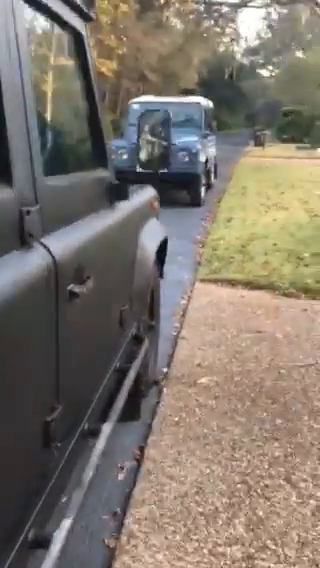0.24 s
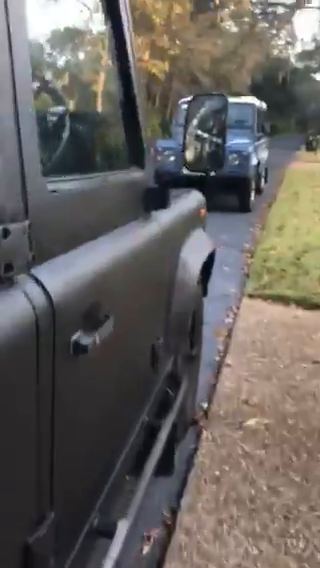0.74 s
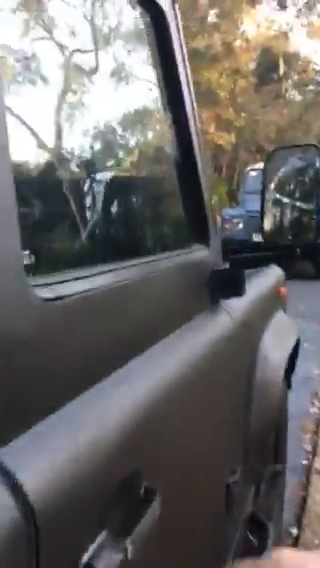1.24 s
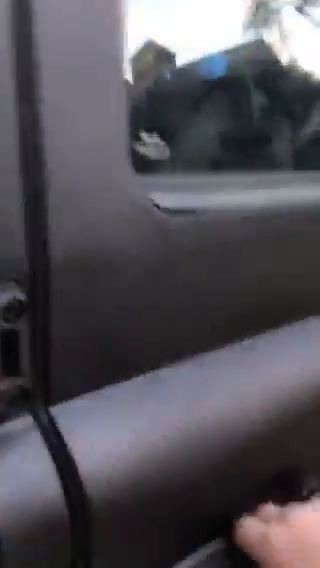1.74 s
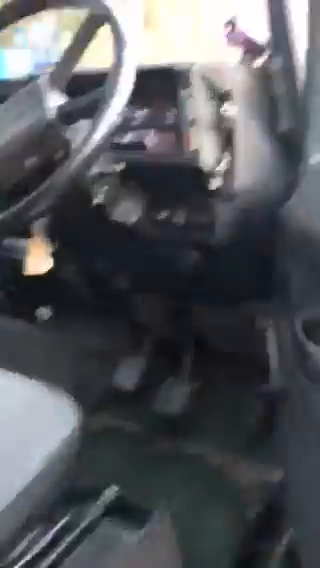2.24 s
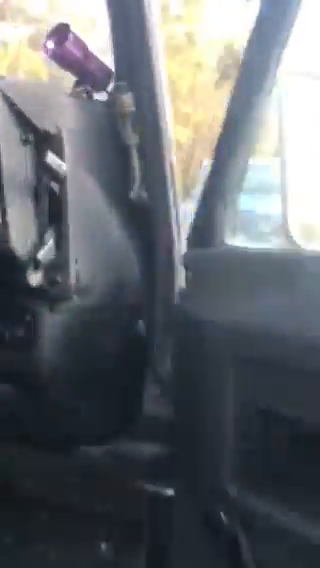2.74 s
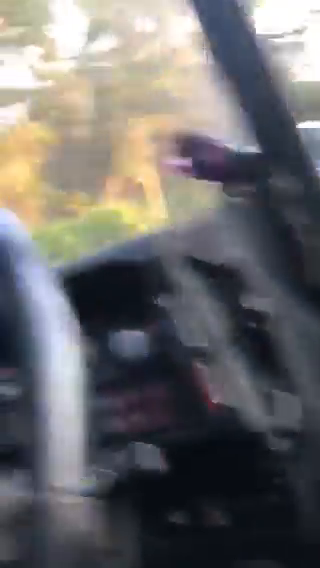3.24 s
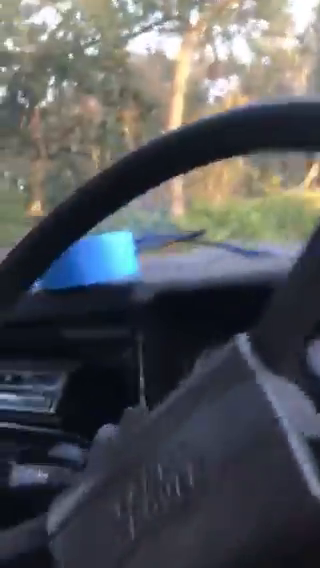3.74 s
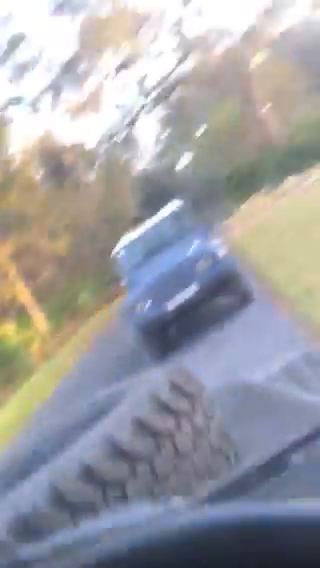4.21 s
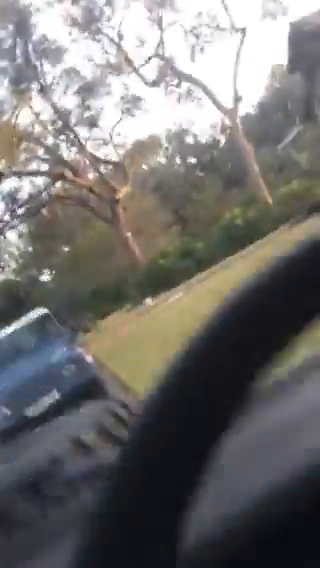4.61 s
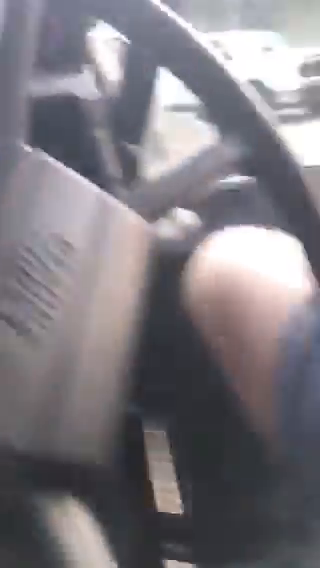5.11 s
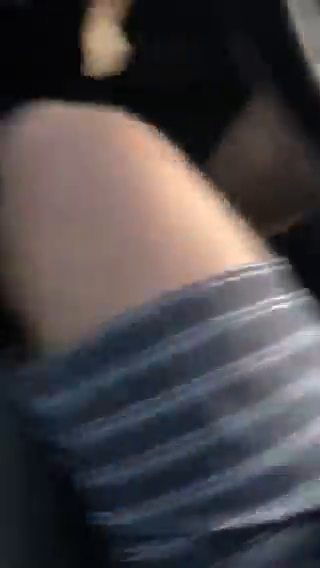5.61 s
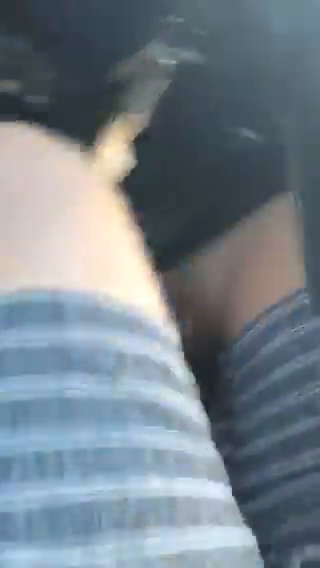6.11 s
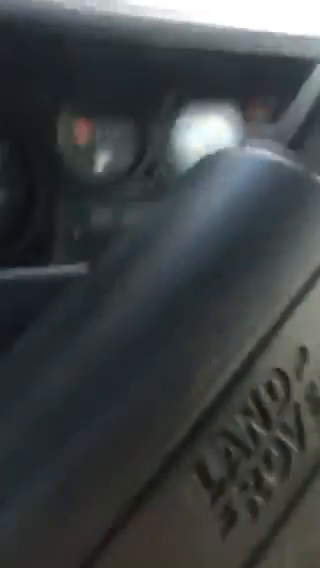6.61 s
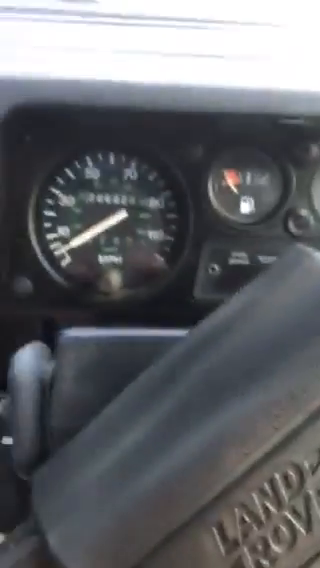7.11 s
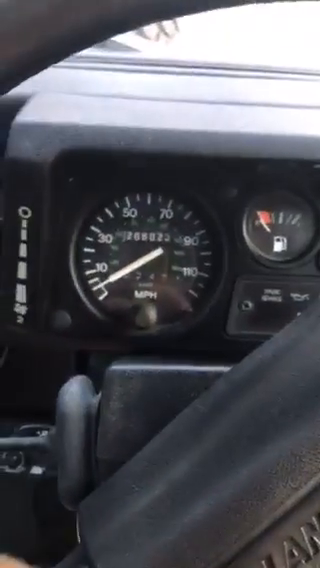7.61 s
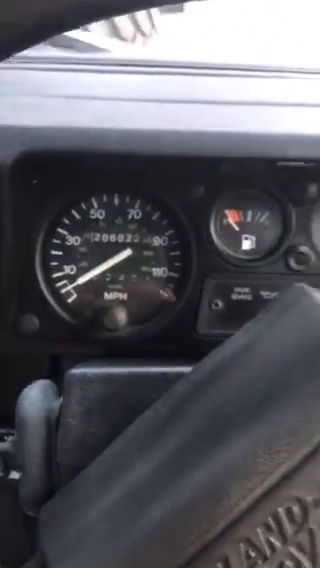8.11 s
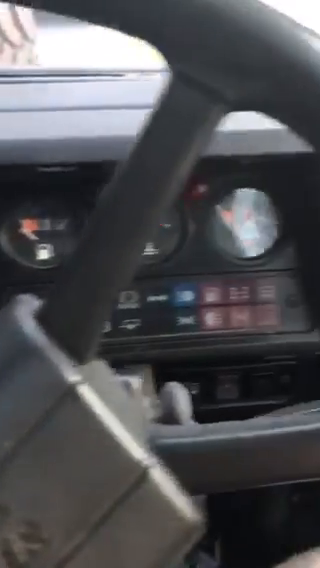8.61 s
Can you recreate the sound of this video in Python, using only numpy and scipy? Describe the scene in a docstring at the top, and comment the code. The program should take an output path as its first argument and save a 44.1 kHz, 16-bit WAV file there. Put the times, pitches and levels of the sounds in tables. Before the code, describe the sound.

A vehicle's metal door unlatches, someone climbs in with thuds and rustling, then slams it shut over a low idling engine hum.

```python
"""An off-road vehicle's sheet-metal door opens and, once someone has climbed in, slams shut.
Handle, latch and slam ring panel modes; the body then rocks and loose fittings rattle.
Feet and weight make the cabin boom, hard trim clicks, clothes slide, the seat creaks and squeals.
An engine idles nearby. The shut door seals out the outdoor hiss; the low hum comes through."""
import sys
import numpy as np
from scipy import signal
from scipy.fft import rfft, irfft, next_fast_len
from scipy.io import wavfile
from scipy.ndimage import uniform_filter1d

SR = 44100
rng = np.random.default_rng(int(sys.argv[2]) if len(sys.argv) > 2 else 0)


def int16_out(signal):
    """Quantize to a 16-bit WAV file."""
    q = np.round(np.clip(np.atleast_2d(signal).T, -1, 1) * 32767)
    wavfile.write(sys.argv[1], SR, q.astype(np.int16))


N = 390417
T = np.arange(N) / SR
SHUT_S = 6.01  # door meets its seal

# Noise spectra. Each row: frequency in Hz, relative level in dB.
OUTSIDE_SPECTRUM = [(110, -36.5), (180, -2), (298, -6.5), (466, -6), (511, -6), (729, 0), (1350, -6),
                    (2840, -20), (5360, -25), (9730, -34.5), (10500, -37.5), (12600, -36), (15500, -43)]  # open air and engine fan
CABIN_SPECTRUM = [(150, -30), (250, -5.5), (347, -9.5), (385, -4), (474, -8.5), (795, -5), (852, -5.5),
                  (1380, -11.5), (1510, -14), (2090, -15.5), (15500, -26)]
EXHAUST_SPECTRUM = [(20, -10.5), (35, -8), (48, -3.5), (62, 2.5), (85, -5), (120, -3), (160, -11),
                    (210, -18.5), (300, -35.5), (500, -57), (2000, -100)]
SWISH_SPECTRUM = [(200, 13), (480, 2.5), (770, 8), (1500, 1.5), (1980, 6), (2900, 1), (3920, 2.5),
                  (5200, 0.5), (6200, -2), (8500, -2), (10300, -6.5), (11500, -4.5), (14000, -5.5),
                  (16000, -11)]
SCUFF_SPECTRUM = [(200, 16.5), (450, -5), (620, -1.5), (1400, 0.5), (2800, -6.5), (3400, -11), (8000, -17),
                  (15000, -51)]
CREAK_SPECTRUM = [(300, -22), (480, 1.5), (600, 9), (1400, 0), (2300, -1.5), (2820, -5), (3200, -15),
                  (4500, -31), (5350, -15), (6000, -17), (15000, -29)]
# Outdoor hiss screened as the phone moves inside, then as the door is pulled to.
# Each row: start in seconds, end in seconds, change in dB.
SCREENING = [(2.0, 3.3, -4.5), (5.15, 5.497, -5)]
# Idle hum. Each row: multiple of the firing rate, relative level in dB.
FIRING_HARMONICS = [(1, -15), (2, 1), (3, -5), (4, -14), (5, -25.5)]
# Soft swells of hiss: clothes sliding, the latch bolt scraping, the door swishing shut.
# Each row: peak time, rise and fall in seconds, relative level in dB.
SWISHES = [(1.73, 0.14, 0.13, -60), (1.95, 0.11, .06, -60), (2.3, 0.031, 0.12, -62),
           (3.01, 0.24, 0.094, -47.5), (3.48, 0.29, 0.25, -54.5), (3.83, 0.04, .08, -58.5),
           (4.22, 0.25, 0.17, -53), (4.72, 0.28, 0.33, -56.5), (4.97, 0.087, 0.093, -52.5),
           (5.15, 0.12, .05, -54), (5.28, 0.14, 0.15, -58), (5.8, 0.36, 0.6, -56.5),
           (5.97, 0.073, 0.057, -46.5), (6.57, .28, 0.29, -57.5), (6.82, 0.17, 0.11, -55.5)]
# Handle, soles and seat cover scraping. Each row: start and length in seconds, level in dB.
SCUFFS = [(1.48, 0.037, -48), (3.772, 0.14, -47), (4.09, 0.37, -50.5), (4.873, 0.13, -53),
          (6.77, 0.081, -55)]
# Seat and step under load. Each row: start and length in seconds, slips per second, level in dB.
CREAKS = [(3.774, 0.2, 230, -47), (8.749, 0.077, 580, -62.5)]
# Seat frame rubbing. Each row: start and length in seconds, centre and width in Hz, level in dB.
SQUEALS = [(3.782, 0.075, 5350, 200, -63), (3.821, 0.11, 2650, 500, -51.5), (3.89, 0.21, 2530, 450, -57),
           (8.743, 0.12, 578, 50, -64.5)]
# Weight on floor, step and seat; panels flexing. Each row: start in seconds, level in dB,
# boom in Hz, nominal t60 and rise in seconds, panel mode offset in dB.
THUDS = [(1.878, -20.5, 90, 0.11, .004, -3), (1.881, -18.5, 363, 0.063, 0.0071, -14.5),
         (1.996, -17.5, 265, 0.053, 0.0016, -15), (2.002, -24, 99.7, 0.26, 0.0094, -3),
         (2.048, -23.5, 181, 0.13, 0.0021, -16), (2.579, -38.5, 192, 0.16, 0.0076, -14),
         (2.815, -30.5, 199.5, 0.13, 0.014, -13.5), (3.052, -31, 72, .15, 0.013, 0),
         (3.907, -4.5, 75.5, 0.18, 0.017, 2), (3.987, -18.5, 66.3, 0.21, 0.0058, 0.5),
         (5.113, -17, 64.2, 1.0, 0.03, -19.5), (5.286, -9, 68.2, 0.3, 0.011, -1.5),
         (5.326, -4, 77.7, 0.12, 0.0087, -18), (5.563, -19, 79.1, 0.23, 0.029, -2),
         (5.734, -10.5, 69, 0.22, 0.0094, -11.5), (5.811, -20.5, 62.5, 0.26, 0.014, -16),
         (5.973, -11.5, 72, 0.22, .008, 2), (6.003, -2, 72, 0.18, .016, -3.5),
         (6.046, -3, 57.5, 0.29, 0.0039, -4.5), (6.06, -18.5, 192.4, .16, 0.0049, -20),
         (6.151, -20, 61.6, .5, 0.013, -22), (6.282, -23.5, 59, .35, .02, -32),
         (6.608, -22.5, 80, .07, .003, -10), (6.736, -25, 119.2, 0.32, .006, -6.5)]
# Floor and wall panels. Each row: multiple of the boom, relative level in dB, share of the boom's t60.
PANEL_MODES = [(1.87, -3, .8), (2.95, -21, .6)]
# Blows. Each row: start in seconds, relative levels of panel ring, hollow body and contact tick in dB,
# t60 in seconds.
FITTING_BLOWS = [(0.0334, -41.5, -45, -50, 0.022), (1.1362, -39.5, -49, -55, 0.063),
                 (1.2055, -37, -53, -54, 0.11), (2.7765, -34, -36, -50, 0.085),
                 (2.8107, -44, -40.5, -47, 0.061), (5.5398, -42, -58, -52.5, 0.038),
                 (5.7703, -43, -45, -50, 0.031), (5.8096, -40, -41, -52, 0.033),
                 (6.6059, -19.5, -25, -43.5, 0.037)]
FOOT_BLOWS = [(2.7749, -36.5, -41.5, -50, 0.18), (3.0674, -50, -37.5, -51, 0.08),
              (3.9, -30, -29.5, -56, 0.13), (5.2862, -39, -36, -60, 0.13), (5.3332, -46, -35, -60, 0.09),
              (5.5566, -43, -38.5, -61, 0.22), (5.5836, -36.5, -31.5, -56, 0.087),
              (5.7408, -43, -34.5, -58, 0.15), (6.741, -41, -28.5, -62, 0.075),
              (6.7644, -54, -40, -59, 0.18)]
TRIM_BLOWS = [(3.1133, -27.5, -40, -57, 0.042), (3.1946, -29.5, -42.5, -45.5, 0.079),
              (3.4169, -30.5, -49, -65, 0.023), (4.576, -31, -21.5, -51, 0.067),
              (4.5833, -49, -22.5, -63, 0.077), (4.6437, -33, -45, -67, 0.06),
              (4.7418, -34.5, -66, -50, 0.026), (4.9118, -44, -40.5, -70, 0.038),
              (6.6282, -38, -39, -62, 0.035), (6.7294, -32, -24.5, -44.5, 0.036)]
OPENING_BLOWS = [(1.4906, -29.5, -41, -42.5, 0.19), (1.5035, -37, -36.5, -44, 0.069),
                 (1.5185, -24.5, -35.5, -41.5, 0.058), (1.5384, -32, -55, -46, 0.029),
                 (1.8092, -26, -46, -37.5, 0.077), (1.8287, -23.5, -34.5, -40, 0.06),
                 (1.8794, -13.5, -20, -39, 0.062), (1.9329, -33.5, -38, -49, 0.12),
                 (1.966, -36, -52, -54, .08), (1.99, -32, -33.5, -44, .08),
                 (2.0017, -23, -24.5, -39.5, 0.06), (2.0939, -35.5, -44.5, -55, 0.056),
                 (2.1267, -33.5, -41.5, -51.5, 0.076), (2.161, -38.5, -63, -47, 0.091),
                 (2.1884, -29.5, -51, -38.5, 0.052), (2.2134, -39, -38, -52, 0.057)]
SLAM_BLOWS = [(5.971, -14, -20, -31, 0.18), (5.9933, -9, -14.5, -20, 0.11), (6.0122, -17, -14, -19, 0.13),
              (6.0289, -16, -17.5, -27, 0.08), (6.0395, -22, -15.5, -44.5, 0.064),
              (6.0545, -25, -25, -40.5, 0.086), (6.0733, -21, -22, -31.5, 0.092),
              (6.1101, -27.5, -45, -44, 0.1), (6.1413, -33, -42, -43, 0.15), (6.25, -33.5, -55, -46, 0.18),
              (6.2796, -37, -54, -49, 0.081), (6.3011, -39.5, -59, -60, 0.059)]
# Latch release and bounce. Each row: start in seconds, peak in dB.
LATCH_SNAPS = [(2.0215, -9.5), (2.032, -22.5)]
# Clear modes of struck parts. Each row: frequency in Hz, relative level in dB, nominal t60 in seconds.
FLOOR_MODES = [(207, -1, 0.16), (322, -2.5, .1), (357, -2.5, 0.18), (422, -9.5, 0.058), (573, -17.5, 0.072)]
TRIM_MODES = [(298, -5, 0.12), (400, -2.5, 0.059), (524, -3, 0.072), (658, 4.5, 0.048), (944, -7.5, 0.078),
              (1356, -6.5, 0.066), (1687, -4, 0.028), (1967, -7.5, 0.053)]
LATCH_MODES = [(2362, -11.5, .05), (5710, -17, 0.048), (8740, -1, 0.029), (8750, -5.5, 0.042),
               (9320, 3.5, 0.011), (10690, -1, 0.025), (14830, -6.5, .055)]
DOOR_MODES = [(191.2, -7.5, 0.23), (285, -24.5, 0.023), (384, -4.5, 0.11), (615, -4.5, 0.077),
              (700, -6, .08), (1085, -12, 0.1), (1150, -1.5, 0.0732), (1401, -14, 0.068), (1682, -4, 0.059),
              (2250, -3, 0.058), (2820, 2, 0.041), (3130, -1, 0.0467)]
SHELL_MODES = [(215.2, -1, 0.14), (270, -2, 0.21), (503.5, -10.5, 0.15), (580, -7.5, .2), (697, -3.5, 0.11),
               (874, -16, 0.15), (884, -9.5, 0.19), (1088, -7.5, 0.065), (1574, -10, .16),
               (1790, -15.5, 0.14), (1970, -10.5, 0.18), (2085, -11, 0.19), (2660, -11, .12),
               (3120, -10, .12), (3760, -15.5, .1)]
# Dense weak resonances of struck parts. Each row: frequency in Hz, relative level in dB.
FITTING_SPECTRUM = [(150, 2), (300, -3), (1000, -9.5), (1500, 1.5), (3600, 2), (5500, -3.5), (9000, -9.5),
                    (15000, -32)]
FLOOR_SPECTRUM = [(100, -3), (220, 2), (450, -5.5), (800, -18), (1500, -23.5), (4000, -31.5), (15000, -48)]
TRIM_SPECTRUM = [(200, 14), (400, 0), (750, 2.5), (1700, 1.5), (2600, -12), (4000, -11.5), (6000, -19),
                 (9000, -54), (15000, -38)]
DOOR_SPECTRUM = [(100, -6.5), (250, 1), (700, -10.5), (1500, 0), (3800, -13), (6000, -24.5), (9000, -29),
                 (15000, -38.5)]
SHELL_SPECTRUM = [(100, 2), (230, 2), (400, -4), (700, -4), (1500, -10.5), (2600, -11), (4100, -11),
                  (6000, -18), (9000, -24), (15000, -36.5)]


def undb(db):
    """Decibels to gain."""
    return 10 ** (np.asarray(db) / 20)


def unit_rms(x):
    """Scale to rms 1."""
    return x / np.sqrt(np.mean(x ** 2) + 1e-18)


def ramp(start_s, end_s, from_db, to_db):
    """Gain moving between two levels, held outside the span."""
    return undb(np.interp(T, [start_s, end_s], [from_db, to_db]))


def closing(open_db, shut_db):
    """Gain change as the door seals."""
    return ramp(SHUT_S - 0.05, SHUT_S + 0.05, open_db, shut_db)


def add(out, start_s, x):
    """Mix x into out at start_s."""
    i = int(start_s * SR)
    out[i:i + len(x)] += x[:N - i]


def colour(x, spectrum):
    """Filter x by a spectrum, falling steeply below its first point; rms 1."""
    hz, db = np.transpose(spectrum)
    size = next_fast_len(len(x))
    bins_hz = np.maximum(np.fft.rfftfreq(size, 1 / SR), 1)
    gain = undb(np.interp(np.log(bins_hz), np.log(hz), db))
    low_cut = np.minimum(bins_hz / hz[0], 1) ** 2
    return unit_rms(irfft(rfft(x, size) * gain * low_cut, size)[:len(x)])


def band(x, lo_hz, hi_hz):
    """Causal band-pass."""
    return signal.sosfilt(signal.butter(3, [lo_hz, hi_hz], btype="band", fs=SR, output="sos"), x)


def wander(rate_hz):
    """Smooth random drift, spread near 1."""
    hold = int(SR / rate_hz)
    return uniform_filter1d(np.repeat(rng.standard_normal(N // hold + 1), hold), hold)[:N]


def decay(t, t60_s):
    """Exponential fall, 60 dB in t60_s."""
    return np.exp(-np.log(1000) * t / t60_s)


def swell(size):
    """Arched envelope."""
    return np.sqrt(np.hanning(size))


def ring(t, modes, detune=0, t60_scale=0.97):
    """Damped modes; detune shifts them at random, as each blow lands elsewhere."""
    shifts = 1 + detune * rng.standard_normal(len(modes))
    return sum(undb(db) * decay(t, t60_s * t60_scale) * np.sin(2 * np.pi * hz * shift * t)
               for (hz, db, t60_s), shift in zip(modes, shifts))


def blows(rows, modes, spectrum, *, modes_db, impact_db, body_db, panel_db, tick_db,
          tick_t60_scale, tail_db, tail_t60_s, nominal_t60_s):
    """Each blow rings clear modes and dense weak ones, split into body, panel and tick bands."""
    out, t = np.zeros(N), np.arange(SR // 2) / SR
    head = SR // 50  # first 20 ms set each band's level
    chatter = undb(2.5 * wander(450))  # loose parts touch and part
    for start_s, row_panel_db, row_body_db, row_tick_db, t60_s in rows:
        force = rng.standard_normal(len(t)) * unit_rms(np.roll(chatter, -int(start_s * SR))[:len(t)])
        force[head // 20] += undb(impact_db)  # one hard contact
        dense = colour(force, spectrum)
        tail = undb(tail_db) * decay(t, tail_t60_s)  # bodywork shivers on
        clear = undb(modes_db) * ring(t, modes, detune=0.011, t60_scale=t60_s / nominal_t60_s)
        struck = clear + dense * (decay(t, t60_s) + tail)
        body = band(struck, 150, 900)
        panel = band(struck, 900, 4000)
        tick = band(dense * (decay(t, t60_s * tick_t60_scale) + tail / 2), 4000, 17000)
        for part, db in ((body, row_body_db + body_db), (panel, row_panel_db + panel_db),
                         (tick, row_tick_db + tick_db)):
            add(out, start_s, undb(db) * part / np.std(part[:head]))
    return out


def air(outside_db=-52, sealed_db=-29, cabin_db=-68.5):
    """Outdoor hiss, screened in stages until the door seals, over a faint cabin hush."""
    screening = np.prod([ramp(start_s, end_s, 0, db) for start_s, end_s, db in SCREENING], axis=0)
    outside = colour(rng.standard_normal(N), OUTSIDE_SPECTRUM) * undb(outside_db + 1.1 * wander(23))
    cabin = undb(cabin_db) * colour(rng.standard_normal(N), CABIN_SPECTRUM)
    return outside * screening * closing(0, sealed_db) + cabin


def engine(firing_hz=37.84, base_db=-50, wander_db=2):
    """Wavering firing harmonics over exhaust rumble; the shut cabin favours the harmonics."""
    phase = 2 * np.pi * np.cumsum(firing_hz * (1 + 0.005 * wander(4))) / SR
    hum = unit_rms(sum(undb(db + 1.5 * wander(4.6)) * np.sin(order * phase + rng.uniform(0, 2 * np.pi))
                       for order, db in FIRING_HARMONICS))
    rumble = colour(rng.standard_normal(N), EXHAUST_SPECTRUM)
    gain = undb(base_db + wander_db * wander(1.2))
    return gain * (hum * closing(0, 2) + rumble * closing(4.5, -1.5))


def swishes(gain_db=1, edge_db=-10, grain_db=1, flutter_db=0.85):
    """Soft swells of grainy hiss: clothes slide, the latch bolt scrapes, the door swishes shut."""
    power = np.zeros(N)
    for peak_s, rise_s, fall_s, db in SWISHES:
        from_peak = (T - peak_s) / np.where(T < peak_s, rise_s, fall_s)
        power += undb(db + edge_db * from_peak ** 2) ** 2
    hiss = rng.standard_normal(N) * undb(grain_db * wander(1500) + flutter_db * wander(45))
    return undb(gain_db) * np.sqrt(power) * colour(hiss, SWISH_SPECTRUM)


def scuffs(judder_db=3.5):
    """Handle, soles and seat cover scrape in short juddering swells."""
    envelope = np.zeros(N)
    for start_s, length_s, db in SCUFFS:
        add(envelope, start_s, undb(db) * swell(int(length_s * SR)))
    friction = rng.standard_normal(N) * undb(judder_db * wander(250))
    return envelope * colour(friction, SCUFF_SPECTRUM)


def creaks(jitter=0.021, grit_db=5):
    """Seat and step stick and slip: an uneven train of jerks plus grit."""
    out = np.zeros(N)
    for start_s, length_s, slip_hz, db in CREAKS:
        size = int(length_s * SR)
        cycles = np.cumsum(slip_hz * (1 + jitter * wander(260)[:size])) / SR
        jerks = unit_rms(np.diff(np.floor(cycles), prepend=0))
        grit = undb(grit_db) * rng.standard_normal(size)
        add(out, start_s, undb(db) * swell(size) * colour(jerks + grit, CREAK_SPECTRUM))
    return out


def squeals():
    """Rubbing keeps a narrow seat frame resonance ringing unevenly."""
    out = np.zeros(N)
    for start_s, length_s, hz, width_hz, db in SQUEALS:
        size = int(length_s * SR)
        tone = unit_rms(band(rng.standard_normal(size), hz - width_hz / 2, hz + width_hz / 2))
        add(out, start_s, undb(db) * swell(size) * tone)
    return out


def fitting_clicks():
    """Small hard fittings give bright, short blows."""
    return blows(FITTING_BLOWS, TRIM_MODES, FITTING_SPECTRUM, modes_db=-11.5, impact_db=28.5,
                 body_db=-9.5, panel_db=-15.5, tick_db=-7.5, tick_t60_scale=0.97,
                 tail_db=-16, tail_t60_s=0.1, nominal_t60_s=0.051)


def footsteps():
    """Soft soles on step and mat ring the floor pan dully."""
    return blows(FOOT_BLOWS, FLOOR_MODES, FLOOR_SPECTRUM, modes_db=3.5, impact_db=2,
                 body_db=-6, panel_db=-15.5, tick_db=-7.5, tick_t60_scale=0.5,
                 tail_db=-23, tail_t60_s=0.2, nominal_t60_s=0.1)


def trim_knocks():
    """Knocks ring the dashboard and wheel."""
    return blows(TRIM_BLOWS, TRIM_MODES, TRIM_SPECTRUM, modes_db=-3.5, impact_db=-3,
                 body_db=-9.5, panel_db=-15, tick_db=-9.5, tick_t60_scale=0.6,
                 tail_db=-21, tail_t60_s=0.22, nominal_t60_s=0.063)


def cabin_thuds():
    """Soft heavy pushes swell the cabin's air boom and the panel modes above it."""
    out, t = np.zeros(N), np.arange(SR) / SR
    for start_s, db, boom_hz, t60_s, rise_s, panel_db in THUDS:
        panels = [(boom_hz * ratio, mode_db + panel_db, t60_s * share)
                  for ratio, mode_db, share in PANEL_MODES]
        boom = ring(t, [(boom_hz, 0, t60_s)] + panels)
        push = np.sin(np.pi / 2 * np.minimum(t / rise_s, 1)) ** 2
        rise_loss = decay(rise_s / 2, t60_s)
        add(out, start_s, undb(db) * push * boom / rise_loss)
    return out


def latch(clatter_db=3.5, clatter_t60_s=0.039):
    """The steel latch springs free and bounces: bright modes in a burst of clatter."""
    out, t = np.zeros(N), np.arange(SR // 5) / SR
    for start_s, peak_db in LATCH_SNAPS:
        clatter = unit_rms(band(rng.standard_normal(len(t)), 870, 10800)) * decay(t, clatter_t60_s)
        snap = ring(t, LATCH_MODES, detune=0.002) + undb(clatter_db) * clatter
        add(out, start_s, undb(peak_db) * snap / np.abs(snap).max())
    return out


def door_opening():
    """Handle, lock and hinge knock on the sheet-metal door."""
    return blows(OPENING_BLOWS, DOOR_MODES, DOOR_SPECTRUM, modes_db=-5, impact_db=13.5,
                 body_db=-6.5, panel_db=-15, tick_db=-4.5, tick_t60_scale=0.81,
                 tail_db=-21, tail_t60_s=0.26, nominal_t60_s=0.06)


def shudder(rock_db=-25, rock_t60_s=2.4, rattle_db=-29.5, rattle_t60_s=0.69, rise_s=0.011):
    """After the slam the body rocks on its springs and loose fittings rattle."""
    since_s = np.maximum(T - SHUT_S, 0)
    rock = colour(rng.standard_normal(N),
                  [(18, -2), (30, -4), (55, -7.5), (100, -17.5), (200, -24.5), (400, -47.5), (1000, -76)])
    contacts = rng.standard_normal(N) * undb(4.9 * wander(300))
    rattle = colour(contacts, [(150, -0.5), (350, 4), (700, 0), (1600, -17), (4000, -10),
                               (8000, -30.5), (15000, -38.5)])
    rock *= undb(rock_db) * decay(since_s, rock_t60_s)
    rattle *= undb(rattle_db) * decay(since_s, rattle_t60_s)
    return np.minimum(since_s / rise_s, 1) * (rock + rattle)


def door_slam():
    """Catch, striker and frame hit in turn, then rattles; the whole body shell rings."""
    return blows(SLAM_BLOWS, SHELL_MODES, SHELL_SPECTRUM, modes_db=-6.5, impact_db=8.5,
                 body_db=-7, panel_db=-12, tick_db=-8, tick_t60_scale=0.95,
                 tail_db=-20, tail_t60_s=0.28, nominal_t60_s=0.12)


def scene():
    """Mono sum of impacts, friction and background."""
    knocks = door_opening() + door_slam() + trim_knocks() + footsteps() + fitting_clicks() + latch()
    booms = cabin_thuds() + shudder()
    friction = swishes() + scuffs() + creaks() + squeals()
    return (knocks + booms + friction + engine() + air())[None]


def record(dry):
    """The phone rounds the loudest peaks and cuts the top treble."""
    top_hz = 15900
    low_pass = signal.ellip(10, 0.2, 70, top_hz, fs=SR, output="sos")
    return signal.sosfilt(low_pass, np.tanh(dry))


dry = scene()
out = record(dry)
int16_out(out)
```